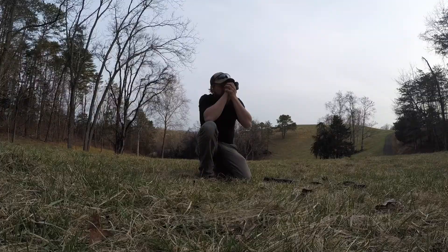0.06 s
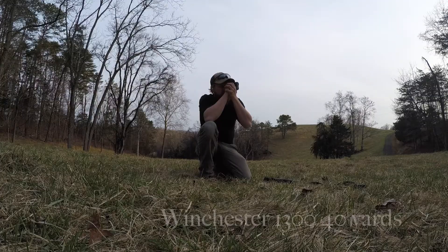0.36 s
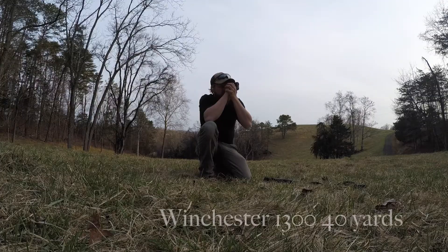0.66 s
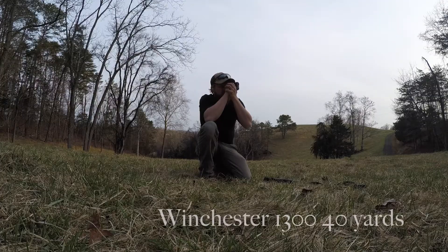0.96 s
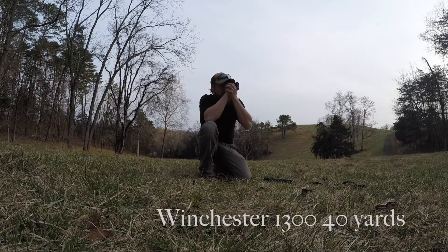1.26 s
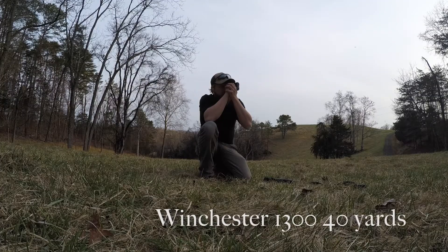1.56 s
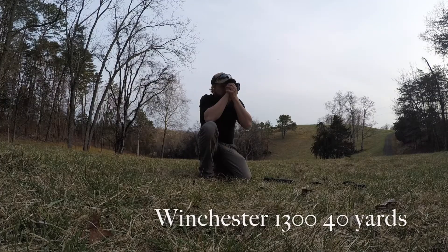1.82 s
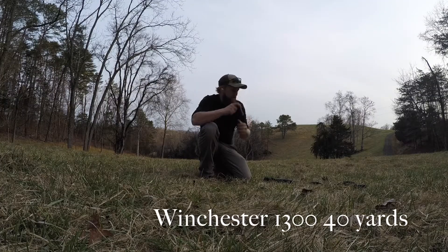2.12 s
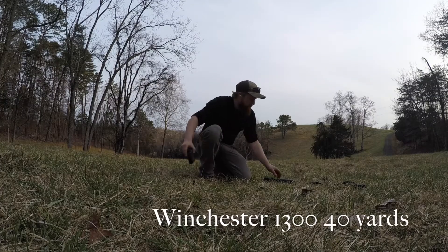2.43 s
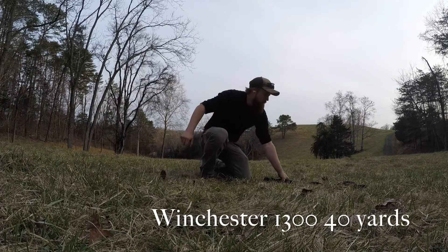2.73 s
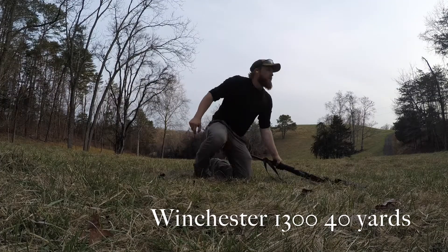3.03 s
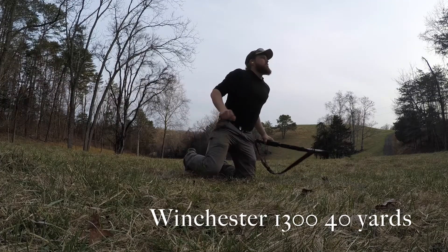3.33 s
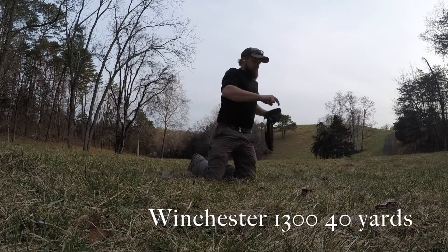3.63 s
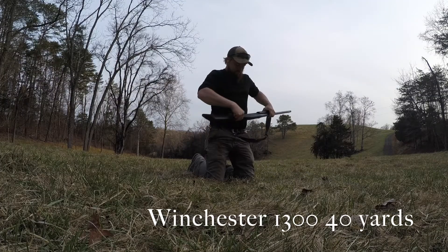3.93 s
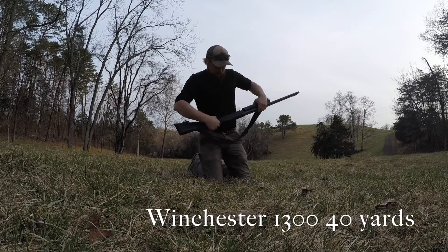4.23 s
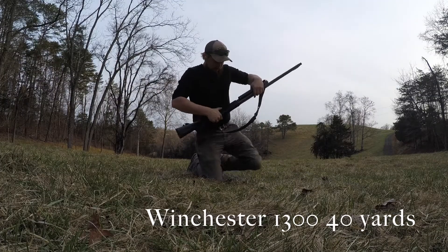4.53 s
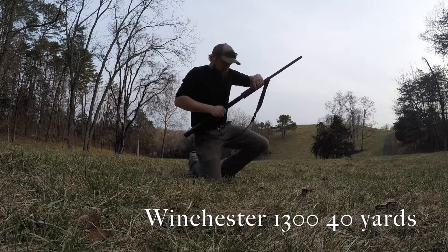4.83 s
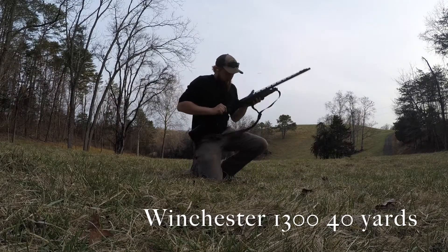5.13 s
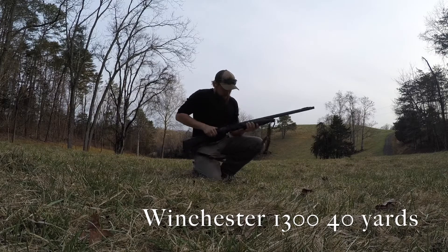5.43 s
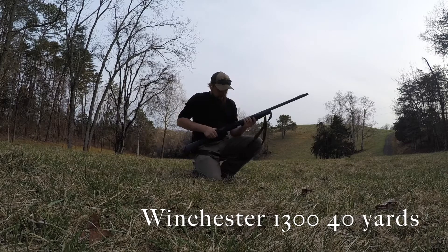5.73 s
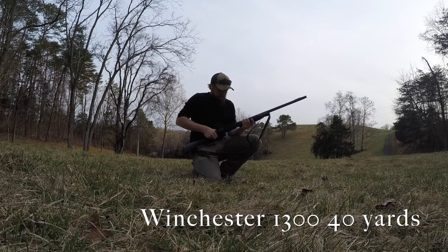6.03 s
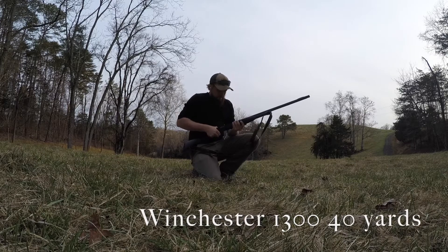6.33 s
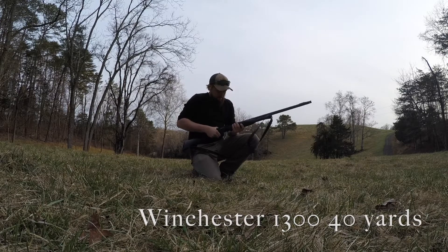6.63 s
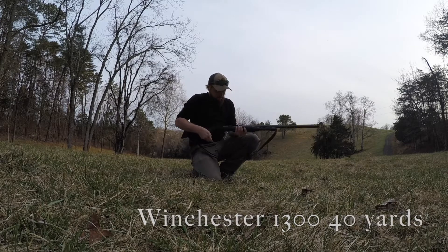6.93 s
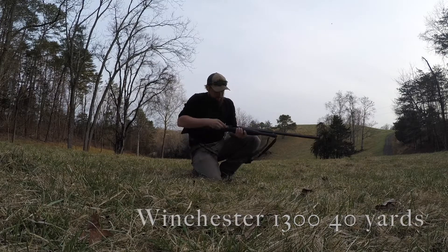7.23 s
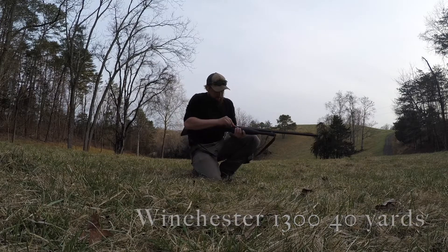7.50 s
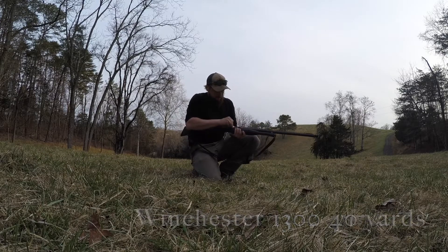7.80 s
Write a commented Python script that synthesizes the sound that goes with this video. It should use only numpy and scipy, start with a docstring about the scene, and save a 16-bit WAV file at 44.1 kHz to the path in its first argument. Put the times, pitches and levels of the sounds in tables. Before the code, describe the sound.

A distant engine drones over a low outdoor rumble while a pump shotgun is handled, its slide worked with sharp metallic clicks.

```python
"""A pump shotgun is lifted out of the grass and shifted, then its slide and a small catch are worked.
Steel parts click and ring, the rails rub, the stock knocks, and grass and sleeves brush past.
A distant piston engine drones all the while, slowly sinking in pitch, over a low outdoor rumble;
a far bird whistles faintly. A small camera in the grass hears it, a little louder on the right."""
import sys
import numpy as np
from scipy import signal
from scipy.fft import rfft, irfft, next_fast_len
from scipy.io import wavfile
from scipy.ndimage import uniform_filter1d, minimum_filter1d, map_coordinates

SR = 44100
rng = np.random.default_rng(int(sys.argv[2]) if len(sys.argv) > 2 else 0)


def transcribe(signal):
    """Save signal, clipped to [-1, 1], as a 16-bit WAV file at the path in sys.argv[1]."""
    frames = np.atleast_2d(signal).T
    limited = np.clip(frames, -1, 1)
    pcm = np.round(limited * 32767).astype(np.int16)
    wavfile.write(sys.argv[1], SR, pcm)


N = 351036

# how far the wave at the left microphone is ahead (negative: behind): f/Hz, phase/rad
LEFT_LEAD = [(20, -.02), (60, -.11), (120, -.2), (220, -.3), (330, -1.3), (520, -2.2), (950, -3.3),
             (1900, -3.6), (4100, -6.3), (8000, -12.5), (15000, -23.5)]


def amp(db):
    """Turn decibels into a gain."""
    return 10 ** (np.asarray(db) / 20)


def unit(x):
    """Scale x to an average (rms) level of 1."""
    return x / np.sqrt(np.mean(x ** 2) + 1e-20)


def along(points, hz):
    """Read between (frequency, value) points on a log frequency axis."""
    freqs, values = np.transpose(points)
    return np.interp(np.log(hz + 1), np.log(freqs + 1), values)


def curve(points):
    """Join (time, value) points with straight lines, one value per sample."""
    return np.interp(np.arange(N) / SR, *np.transpose(points))


def wobble(rate):
    """A smooth random curve through `rate` points a second."""
    return map_coordinates(rng.standard_normal(int(N * rate / SR) + 4), [np.arange(N) * rate / SR])


def stroke(start, end, attack, release):
    """A gain that holds from start to end, 20 dB lower one attack before and one release after."""
    t = np.arange(N) / SR
    return amp(-20 * (np.maximum(start - t, 0) / attack + np.maximum(t - end, 0) / release))


def passing_db(nearest_s, passing_s):
    """Level of a passing source: 0 dB when nearest, 3 dB lower passing_s before or after."""
    return -10 * np.log10(1 + ((np.arange(N) / SR - nearest_s) / passing_s) ** 2)


def filtered(x, response):
    """Change the strength and phase of each frequency in x by response(hz)."""
    size = x.shape[-1]
    padded = next_fast_len(size + 8192)
    return irfft(rfft(x, padded) * response(np.fft.rfftfreq(padded, 1 / SR)), padded)[..., :size]


def causal(x, gain_db):
    """Filter x by gain_db(hz) so that nothing rings before a hit (minimum phase)."""
    size = 2048
    cepstrum = irfft(np.log(amp(gain_db(np.fft.rfftfreq(size, 1 / SR))) + 1e-6))
    fold = np.r_[1, np.full(size // 2 - 1, 2), 1, np.zeros(size // 2 - 1)]
    impulse_response = irfft(np.exp(rfft(cepstrum * fold)))
    return signal.fftconvolve(x, impulse_response[None], axes=1)[:, :x.shape[1]]


def add(track, s, sound):
    """Mix a stereo sound in at s seconds."""
    part = track[:, round(s * SR):][:, :sound.shape[1]]
    part += sound[:, :part.shape[1]]


def far_mic_gains(hz):
    """The strength and phase with which far sound reaches each microphone."""
    # level on the left compared with the right: f/Hz, level/dB
    balance = [(60, -1.5), (110, -1.5), (200, -3.5), (370, -9), (690, -6.0), (1270, -3.5), (2340, -1),
               (4300, 0.5), (7920, -3), (14600, -0.5)]
    half = amp(along(balance, hz) / 2) * np.exp(1j * along(LEFT_LEAD, hz) / 2)
    return np.array([half, 1 / half])


def far_noise(spectrum):
    """Stereo noise from far away: the lows are nearly alike on both sides, the highs are not."""
    # how alike left and right are: f/Hz, likeness (0 to 1)
    likeness = [(30, 0.94), (150, 0.99), (230, 1), (290, 0.78), (500, 0.96), (750, 0.89), (1100, 0.86),
                (2000, 0.72), (3500, 0.22), (10000, 0.092)]
    def shape(hz):
        angle = np.arccos(np.clip(along(likeness, hz), -1, 1)) / 2
        return amp(along(spectrum, hz)) * [np.cos(angle), np.sin(angle)]
    mid, side = filtered(rng.standard_normal((2, N)), shape)
    pair = filtered(np.array([mid + side, mid - side]), far_mic_gains)
    return pair / pair.mean(axis=0).std()


def near_noise(size, apart):
    """White noise; the larger `apart` is, the less the two microphones share."""
    return unit(rng.standard_normal(size) + apart * rng.standard_normal((2, size)))


def air():
    """Rumble and roar carry over the field and swell as the engine passes, under a thin steady hiss."""
    # tone colour of each noise, lowest first: f/Hz, relative level/dB
    deep_shape = [(10, -17), (20, -12), (30, -0.5), (42, 7), (52, 12), (68, 0.5), (85, -9.5), (130, -66.5)]
    rumble_shape = [(50, -39.5), (72, 2.5), (98, -1), (135, -6), (160, -9), (200, -31.5), (300, -71.5)]
    boom_shape = [(110, -25.5), (155, 2.5), (190, -5.5), (215, -1.5), (240, -16), (300, -28), (500, -70)]
    roar_shape = [(150, -39), (250, 2), (330, -3.5), (450, -1), (560, 1.5), (720, -6.5), (1100, -35),
                  (2500, -82)]
    rush_shape = [(400, -24.5), (700, -4.5), (950, 0.5), (1220, 3), (1450, -3.5), (1720, -6), (2000, -13),
                  (2700, -25), (4000, -33), (8000, -58)]
    hiss_shape = [(1500, -21), (2500, -4), (3300, -4), (4300, -5.5), (5200, -4), (7000, -2), (8200, -4.5),
                  (9900, -3), (11000, -8), (12500, -15.5), (14500, -49)]
    # loudness of the engine's roar: t/s, level/dB
    roar_levels = [(0, -46.5), (1.1, -46.5), (2.1, -44.5), (3, -46), (4.3, -47.5), (5.1, -47.5),
                   (5.9, -47.5), (6.9, -51), (7.96, -48)]
    near_db = passing_db(nearest_s=3.6, passing_s=2.8)
    swell_from_s, swell_db_per_s = 6.45, 4  # a low rumble swells near the end
    swell_db = swell_db_per_s * np.maximum(np.arange(N) / SR - swell_from_s, 0)
    deep = amp(-27) * far_noise(deep_shape)
    rumble = amp(-26 + swell_db) * far_noise(rumble_shape)
    boom = amp(-34.5 + 0.56 * near_db) * far_noise(boom_shape)
    roar = amp(curve(roar_levels) + 0.8 * wobble(8)) * far_noise(roar_shape)
    rush = amp(-49.5 + 0.38 * near_db + 1.1 * wobble(4.164)) * far_noise(rush_shape)
    hiss = amp(-63.5) * far_noise(hiss_shape)
    return deep + rumble + boom + roar + rush + hiss


def bird():
    """A far bird whistles faintly, each note a single downward slide."""
    # whistles: t/s, level/dB, first f/Hz, last f/Hz
    whistles = [(.11, -69, 8100, 7150), (.94, -69, 7500, 6100), (4.98, -71, 6960, 5550)]
    whistle_s = .1
    track, progress = np.zeros((2, N)), np.linspace(0, 1, round(whistle_s * SR))
    swell = np.sqrt(np.abs(np.sin(np.pi * progress)))
    for s, db, first_hz, last_hz in whistles:
        phase = 2 * np.pi * np.cumsum(first_hz + (last_hz - first_hz) * progress) / SR
        add(track, s, np.tile(amp(db) * swell * np.sin(phase), (2, 1)))
    return track


def engine():
    """Exhaust puffs hum at multiples of one cycle rate; the tones fade in and out over the long path."""
    # loudness of the firing tone, its octave and the seventh multiple: t/s, relative level/dB
    firing_levels = [(0, -18.5), (0.55, -20), (1.2, -15.5), (1.7, -16.5), (2.15, -14), (2.6, -15), (3, -12),
                     (3.3, -14), (3.6, -13.5), (4.15, -18.5), (4.65, -19), (4.9, -15.5), (5.55, -14),
                     (5.78, -19), (5.95, -17), (6.25, -24.5), (6.7, -19.5), (7.96, -21.5)]
    octave_levels = [(0.12, -22), (0.42, -32.5), (0.75, -24.5), (1.65, -21.5), (2.2, -27.5), (2.7, -17),
                     (2.95, -27), (3.3, -20), (4, -16.5), (4.6, -19.5), (5.25, -23.5), (5.85, -18),
                     (6.2, -22.5), (6.6, -22), (6.9, -17), (7.3, -27.5), (7.5, -26), (7.96, -19.5)]
    seventh_levels = [(0, -40.5), (.5, -37), (1.05, -31.5), (1.5, -37.5), (1.9, -35), (2.1, -39),
                      (2.35, -30.5), (3.1, -30), (3.35, -41.5), (4.3, -36.5), (5.1, -36), (6, -35),
                      (6.7, -45), (7.96, -40.5)]
    # other exhaust tones: multiple of the cycle rate, relative level/dB, loudest t/s, time to fall 4 dB/s
    overtones = [(1, 3.5, 3.3, 6), (5, 7, 5.7, 3), (6, 4.5, 2.84, 1.5), (8, -20, 1.7, 4.5),
                 (9, -13, 3.6, 3.5), (10, -23.5, 2.5, 2.5), (11, -17.5, 2.9, 4), (12, -18, 0.76, 4),
                 (13, -18, 2.7, 2), (14, -17.5, 2.6, 3), (15, -24.5, 3.4, 0.5), (16, -16, 2, 2.5),
                 (17, -30.5, 2.3, 4), (18, -24, 4, 1)]
    t = np.arange(N) / SR
    start_hz, sink_from_s, sink_hz_per_s = 30.54, 1.6, .185  # the pitch sinks as it draws away
    cycle_hz = start_hz - sink_hz_per_s * np.maximum(t - sink_from_s, 0)
    cycle_phase = 2 * np.pi * np.cumsum(cycle_hz) / SR
    def tone(multiple, db, scattered):
        mics = far_mic_gains(multiple * cycle_hz.mean())[:, None]
        paths = 1 + scattered * (wobble(3.2) + 1j * wobble(3.2))  # a direct path and a shifting one
        # the firing tone and its octave come from the same puff, so they start in step
        phase = multiple * cycle_phase + rng.uniform(0, 2 * np.pi) * (multiple not in (2, 4))
        return np.sqrt(2) * amp(db) * np.imag(paths * mics / np.abs(mics.mean()) * np.exp(1j * phase))
    firing = tone(2, curve(firing_levels), scattered=.04)
    octave = tone(4, curve(octave_levels), scattered=.1)
    third = tone(3, curve([(4.14, -35.5), (5.07, -26)]), scattered=.14)  # comes up once and stays
    seventh = tone(7, curve(seventh_levels) - 1, scattered=.12)
    others = sum(tone(multiple, db - 36 + 1.32 * passing_db(loudest_s, swell_s), scattered=.47)
                 for multiple, db, loudest_s, swell_s in overtones)
    return firing + octave + third + seventh + others


def rustle():
    """Grass, then sling and sleeves brush past the gun, while single dry blades snap."""
    # brushing moves: start/s, end/s, level/dB, attack/s, release/s
    brushes = [(2.638, 2.661, -57.5, 0.15, .15), (2.856, 3.37, -55, 0.11, 0.8),
               (3.114, 3.136, -48, 0.041, 0.034), (3.184, 3.234, -42.5, 0.09, 0.095),
               (4.179, 4.27, -60.5, 0.2, 0.23), (4.556, 5.483, -62, 0.18, 0.49),
               (4.623, 4.635, -44, 0.02, 0.04), (4.769, 4.802, -52.5, 0.14, 0.036)]
    # tone colour of the rustle: f/Hz, relative level/dB
    grass_shape = [(900, -28), (2000, -18.5), (3500, -14.5), (5400, -9.5), (6400, -2.5), (7600, 1),
                   (8300, -6), (9000, -4.5), (11000, -16), (14500, -22.5)]
    snaps_per_s, snap_spread_db, snap_db = 400, 3, -8
    sweep = sum(amp(db) * stroke(start, end, attack, release) for start, end, db, attack, release in brushes)
    brushing = near_noise(N, apart=1.5) * amp(1.8 * wobble(1500) + 1.4 * wobble(120))
    sizes = amp(snap_spread_db * np.minimum(rng.exponential(size=N), 3))
    snapping = rng.random(N) < snaps_per_s / SR
    snaps = unit(snapping * sizes * (1 + .5 * rng.standard_normal((2, N))))
    return sweep * unit(causal(brushing + amp(snap_db) * snaps, lambda hz: along(grass_shape, hz)))


def stock_bumps():
    """The gun's stock answers a blow with a short, dull knock."""
    # blows on the stock: t/s, relative level/dB, f/Hz
    blows = [(4.261, -35, 288), (4.305, -32, 298), (6.138, -28.5, 495), (6.164, -35, 342)]
    track, t = np.zeros((2, N)), np.arange(SR // 4) / SR
    fade_s, half_width_hz = .044, 50
    for s, db, pitch_hz in blows:
        blow = near_noise(len(t), apart=0.14) * amp(-60 * t / fade_s)
        knock = causal(blow, lambda hz: -20 * np.log10(1 + ((hz - pitch_hz) / half_width_hz) ** 2))
        add(track, s, amp(db + 4) * knock / np.abs(knock).max())
    return track


def slide():
    """The sliding grip sticks and slips on its steel rails, back and then forward."""
    # pushes on the grip: start/s, end/s, level/dB, attack/s, release/s
    pushes = [(6.132, 6.198, -41.5, 0.019, 0.02), (6.27, 6.299, -35.5, 0.042, 0.036),
              (6.313, 6.364, -40, 0.016, 0.024)]
    # tone colour of the rails: f/Hz, relative level/dB
    rail_shape = [(500, -26), (1100, -1.5), (1500, 0), (1950, -1.5), (2500, -4), (2950, -10.5),
                  (3500, -9.5), (4600, -15.5), (5500, -18), (6200, -11), (7400, -16.5), (8700, -18.5),
                  (9400, -24), (12000, -34), (14500, -41)]
    push = sum(amp(db) * stroke(start, end, attack, release) for start, end, db, attack, release in pushes)
    slips = near_noise(N, apart=0.59) * amp(3.5 * wobble(450))
    return push * unit(filtered(slips, lambda hz: amp(along(rail_shape, hz))))


def clicks():
    """Steel parts meet with a crack and a brief rattle that ring the struck part and the gun's frame."""
    # contacts: t/s, relative level/dB, lows/dB, the part's f/Hz, its ping/dB, highs/dB, time to fade 60 dB/s
    contacts = [ (2.654, -37.5, 1, 4400, -9.5, -12, .02), (2.656, -41, 0, 3100, -8, -10, .02),
                (3.0693, -39, 0, 7800, -13.5, 6, .012), (3.072, -46, 2, 3070, -4, -9, .02),
                (4.6313, -32.5, -7, 5000, -16, 13, 0.0073), (4.636, -38, -9.5, 7460, -5.5, 4.5, .025),
                (4.6766, -27.5, 6, 3200, -14, -3, .015), (5.2998, -38, 5, 3450, 0, 1, .028),
                (5.302, -39.5, -5, 7200, -4, -0.5, .025), (6.042, -44, -13, 7300, -4, -7, .022),
                (6.1377, -32.5, 3, 7600, -9, -4, 0.01), (6.1405, -23.5, 2, 7600, -9, 8, .018),
                (6.1643, -22, -1.5, 4420, -7.5, 0, 0.015), (6.167, -20, 1, 3380, -3, 0.5, .014),
                (6.1688, -26, 0.5, 4000, -9.5, -1.5, .014), (6.1945, -35, 4.5, 3600, -12, 5, .015),
                (6.1963, -30, 1, 6600, -12, 4.5, 0.029), (6.237, -45.5, 7, 3500, -6, -1.5, .02),
                (6.2605, -39.5, 5.5, 3400, -12, -4, .016), (6.271, -37.5, 3, 6500, -12.5, 4, .016),
                (6.277, -29.5, -7, 7660, -7.5, 10, .016), (6.2885, -30, 1, 2600, -10, -4, .018),
                (6.291, -30.5, -0.5, 3600, -8, 0, .018), (6.294, -34.5, -4, 5000, -11, 2, .016),
                (6.298, -30, 1, 4400, -10, -2, .014), (6.3135, -38.5, 5.5, 3500, -10.5, -2.5, .018),
                (6.321, -31.5, 17, 2002, -4, -9.5, 0.031), (6.337, -33, 17, 3400, -8.5, -15, .02),
                (6.3439, -28.5, 6.5, 6570, -4.5, 3, .013), (6.352, -38.5, 0, 6600, -4.5, -2, .014),
                (6.358, -19.5, 10, 6630, -12.5, 17.5, .013), (6.363, -28, 7, 4380, -14, 7.5, .012),
                (7.8607, -23.5, 4, 7460, -2, -8, .017), (7.8651, -22, 2, 4280, -7, -7, .014),
                (7.867, -26, 1, 2020, 0, -10, .016)]
    # tone colour of struck steel: f/Hz, relative level/dB
    steel_shape = [(500, -29), (1100, 3.5), (1900, 3), (2950, -12.5), (3400, -10.5), (3900, -7),
                   (4400, -8.5), (5100, -7.5), (5600, -11.5), (6600, -1), (7500, -3.5), (9000, -6),
                   (11500, -20.5), (13500, -30.5), (15000, -34.5)]
    # ringing notes of the frame and barrel: f/Hz, relative level/dB, time to fade 60 dB/s
    frame_notes = [(1893, -13.5, 0.065), (2360, -24.5, 0.04), (2670, -18.5, 0.044), (3420, -17, 0.026),
                   (4340, -16.5, 0.018), (6700, -18.5, .025)]
    track, t = np.zeros((2, N)), np.arange(SR // 8) / SR
    onset = 1 - np.exp(-t / .00035)
    ground_scatter = amp(-36 - 60 * t / .07)
    for s, db, lows_db, part_hz, ping_db, highs_db, fade_s in contacts:
        rattle = near_noise(len(t), apart=0.38) * (amp(-60 * t / fade_s) + ground_scatter) * onset
        crack = np.linalg.norm(rattle[1]) * signal.unit_impulse(len(t), SR // 3000)
        tilt = [(2000, lows_db), (4000, 0), (8000, 0), (13000, highs_db)]
        part_boost = lambda hz: 4 / (1 + ((hz - part_hz) / 260) ** 2)
        hit = causal(crack + rattle, lambda hz: along(steel_shape, hz) + along(tilt, hz) + part_boost(hz))
        hit /= np.sqrt(np.mean(hit[:, :SR // 300] ** 2))  # the opening instant sets the level
        ring = sum(amp(note_db + rng.normal(0, 3.3) - 60 * t / ring_s)
                   * np.sin(2 * np.pi * hz * rng.normal(1, 0.0087) * t)
                   for hz, note_db, ring_s in frame_notes)
        ping = amp(ping_db - 60 * t / fade_s) * np.sin(2 * np.pi * part_hz * t)
        add(track, s, amp(db - 3.5) * (hit + ring + ping))
    return track


def camera_shadow(x):
    """The camera's body shades the left microphone, so the gun sounds later and duller there."""
    # change on the left side: f/Hz, level/dB
    shadow = [(500, 3), (1100, -1), (2000, 0.5), (3400, -3), (4300, -8), (5200, -15.5), (7400, -12.5),
              (14000, -15.5)]
    def response(hz):
        left = amp(along(shadow, hz)) * np.exp(1j * along(LEFT_LEAD, hz))
        return np.array([left, np.ones(len(hz))])
    return filtered(x, response)


def scene():
    """The gun is handled close by, in front of the far drone."""
    background = engine() + air() + bird()
    return background + camera_shadow(clicks() + stock_bumps() + slide() + rustle())


def record(dry):
    """The camera briefly turns down the loudest peaks and cuts off the highest treble."""
    ceiling_db, top_hz, hold = -3.5, 15200, SR // 40
    needed = np.minimum(1, amp(ceiling_db) / (np.abs(dry).max(axis=0) + 1e-9))
    held = minimum_filter1d(needed, 2 * hold)
    gain = uniform_filter1d(uniform_filter1d(held, hold), hold)
    end_fades = signal.windows.tukey(N, .001)
    return filtered(dry * gain * end_fades, lambda hz: hz < top_hz)


dry = scene()
out = record(dry)
transcribe(out)
```